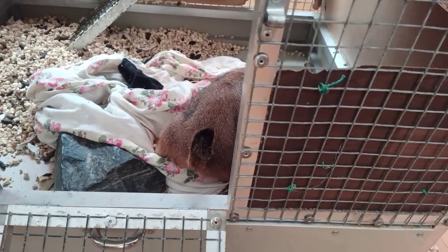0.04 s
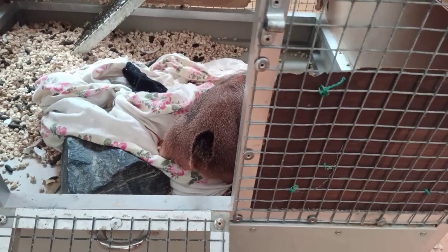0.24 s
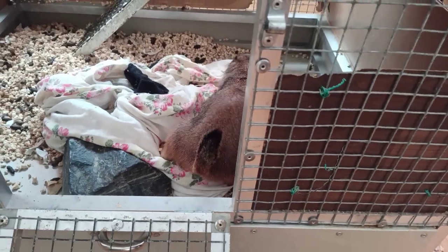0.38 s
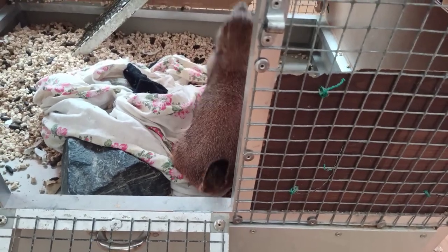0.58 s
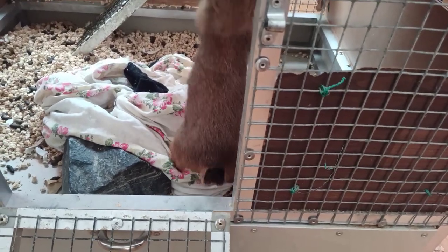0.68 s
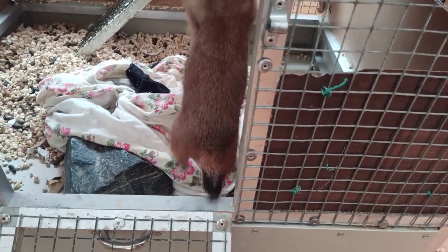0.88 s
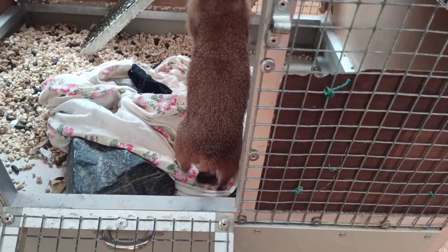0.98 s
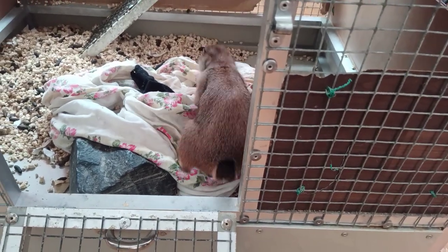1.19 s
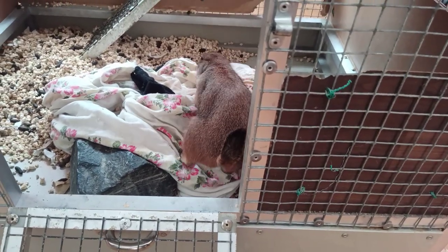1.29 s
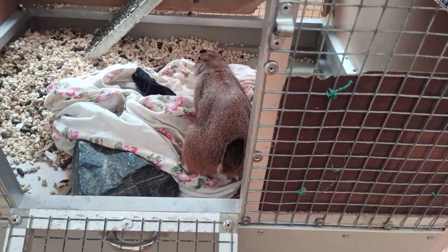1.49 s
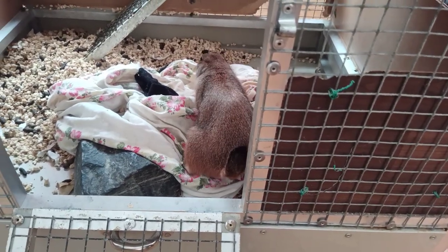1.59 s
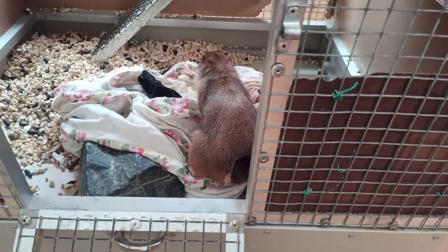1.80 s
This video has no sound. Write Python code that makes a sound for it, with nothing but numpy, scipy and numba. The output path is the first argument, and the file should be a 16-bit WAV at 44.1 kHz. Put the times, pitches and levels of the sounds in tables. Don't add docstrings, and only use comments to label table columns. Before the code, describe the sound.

Prairie dog shrieks and yips loudly in an indoor cage, with small paw knocks and wire rattle

```python
import sys
import numpy as np
from scipy import signal
from scipy.fft import rfft, irfft
from scipy.io import wavfile
from scipy.ndimage import uniform_filter1d
from numba import njit

SR = 44100
rng = np.random.default_rng(int(sys.argv[2]) if len(sys.argv) > 2 else 0)


def master_out(mix):
    frames = np.transpose(np.atleast_2d(mix))
    ceiling = np.clip(frames, -1, 1)
    pcm = np.round(ceiling * 32767).astype(np.int16)
    wavfile.write(sys.argv[1], SR, pcm)


def volts_from_decibels(level):
    exponent = np.asarray(level, float) / 20
    return 10 ** exponent


N = 81585
T = np.arange(N) / SR

# pitch_hz, level_db
FLOOR_COLOUR = [(40, -15), (100, -5.5), (280, -11.5), (700, -20.5), (1700, -26), (2400, -23),
                (11000, -36.5), (15500, -39)]
# start_s, level_db, contact_s, loudest_pitch_hz, spread_octaves
PAW_THUDS = [(0.015, -41, 0.0038, 467, 0.24), (0.026, -36, 0.008, 328, 0.53),
             (0.044, -53, 0.0092, 450, 0.2), (0.06, -43, 0.055, 195, 0.35),
             (0.083, -40.5, 0.023, 113, 0.41), (0.084, -49.5, 0.0051, 460, 0.27),
             (0.152, -43.5, 0.032, 91, 0.64), (.172, -51.5, .02, 420, .3), (.22, -43, .05, 199, 0.18),
             (.3, -66, .02, 259, .3), (0.368, -32, 0.0051, 216.4, 0.83), (0.388, -44.5, 0.035, 460, 0.25),
             (0.593, -30.5, 0.027, 233, 0.8), (0.885, -43, 0.012, 411, 0.68),
             (.905, -52.5, 0.049, 85.5, 0.66), (1.038, -54, 0.016, 520, 0.16),
             (1.549, -43, 0.008, 550, 0.13), (1.556, -35.5, 0.032, 130, .3),
             (1.587, -57.5, 0.031, 420, 0.72), (1.598, -47, 0.013, 130, .3),
             (1.635, -43.5, 0.042, 125, 0.47), (1.693, -50.5, 0.017, 257, 0.46),
             (1.705, -56.5, 0.018, 640, .4), (1.711, -49, 0.029, 127, .6), (1.836, -50.5, 0.017, 896, 0.73)]
# pitch_hz, level_db, t60_s
TRAY_MODES = [(69.6, -4.5, 0.8), (104.2, -20, 0.2), (130, -3.5, 0.14), (219, 1, 0.043), (255, 6, 0.067),
              (320.6, 10.5, 0.035), (420, 6.5, 0.12), (496.4, 7.5, 0.1), (549, 2.5, .06), (640, 0, 0.24),
              (755, 0.5, 0.067), (1030, 5, .05)]
# start_s, wire_crack_level_db, dry_scrape_level_db, contact_s
WIRE_TOUCHES = [(0.024, -68.5, -68.5, 0.02), (0.551, -60, -47, 0.011), (.578, -55, -41, 0.0094),
                (0.588, -34, -40, 0.021), (0.594, -23.5, -40, 0.0089), (0.615, -27, -50, 0.0082),
                (0.8833, -36.5, -75, 0.0031), (0.898, -49, -72, 0.013), (0.93, -60, -70, 0.01),
                (1.037, -58, -91, 0.004), (1.289, -67, -89, 0.0087), (1.551, -58, -45.5, 0.0092),
                (1.56, -59.5, -53.5, 0.022), (1.588, -63, -68.5, 0.012), (1.687, -58, -55, 0.015),
                (1.837, -74.5, -90, 0.0097)]
# pitch_hz, level_db
CRACK_COLOUR = [(150, -15.5), (400, 6), (1800, 1), (3500, 4), (5000, 5), (6800, -13.5), (9500, -19),
                (12000, -50.5)]
SCRAPE_COLOUR = [(2000, -23.5), (4500, -10.5), (6500, -17.5), (8800, 5.5), (11000, -12), (14800, -1.5),
                 (15800, -3)]

# time_s, pitch_hz, level_db, roughness_0_to_1, mouth_opening_0_to_1
CRY = [
    (.177, 740, -59.5, 0.24, 0.24),
    (.186, 718, -42.5, 0.37, 0),
    (.196, 736.7, -44.5, 0.27, 0.04),
    (.203, 860, -39, 0.13, 0.32),
    (.235, 869, -31, 0.07, 0.09),
    (.264, 888.5, -44.5, 0, 0.44),
    (.272, 959, -36, 0.5, 0.4),
    (.285, 1078, -28, 0.2, 0.64),
    (.298, 1151, -27, 0.2, 0.8),
]
SCREAM = [
    (.294, 1162, -32.5, 0.27, 0.98),
    (.31, 1178, -22.5, 0.33, 0.98),
    (.335, 1225, -27, .35, 0.84),
    (.36, 1280, -23, 0.35, 1),
    (.385, 1266, -27, 0.7, 0.95),
    (.41, 1285, -30.5, 0.32, 1),
    (.445, 1282, -35, 1, 0.96),
]
RASP = [
    (.385, 1123, -36.5, .6, 1),
    (.4, 1111, -29, 0.57, 1),
    (.42, 1111, -33, 1, 0.92),
    (.448, 1097, -24.5, 0.58, 1),
    (.49, 1051, -30, 0.59, 1),
    (.52, 982, -32, 0.56, 0.88),
    (.555, 908, -40.5, 0.28, 0.7),
]
YIP = [
    (.548, 978.6, -34, 0.53, 0.87),
    (.578, 1138, -27, 0.16, 0.87),
    (.62, 1201, -26, 0.022, 0.91),
    (.64, 1215, -20, 0.013, 1),
    (.686, 1178, -24, 0.017, 0.99),
    (.7, 1124, -21, 0.16, 0.98),
    (.716, 1065, -51, 0.21, 0.99),
    (.78, 980, -41, 0.89, 0.24),
    (.86, 662, -51.5, 0.82, 0),
]
BARK = [
    (1.037, 1030, -44, 1, 0.46),
    (1.048, 1006, -45.5, 0.73, 0.89),
    (1.058, 1068, -36.5, 0.2, 0.88),
    (1.074, 1149, -41, 0.93, 0.99),
    (1.09, 1175, -39.5, 0.39, 0.94),
    (1.122, 1226, -33.5, 0.22, 1),
    (1.129, 1043, -41.5, 0.67, 1),
    (1.145, 1039, -45, 0.64, 1),
    (1.19, 1138, -54.5, 1, 1),
]
WHISTLE = [
    (1.275, 1688, -59, 0.018, 0.3),
    (1.283, 1520, -46, 0.054, 0.36),
    (1.291, 1491, -36, 0.12, 0.87),
    (1.32, 1426, -43.5, 0.056, 0.4),
    (1.365, 1407, -42, 0.033, 0.83),
    (1.405, 1307, -42, 0.053, 0.55),
    (1.422, 1248, -44, 0.077, 0.84),
    (1.45, 1203, -57, 0.035, 0.99),
    (1.478, 1098, -58.5, 0.052, 0.19),
]
# pitch_hz, level_db
CLOSED_MOUTH = [(880, -1.5), (1750, -19), (3400, -24), (4200, -58.5), (5800, -11.5), (7200, -43),
                (8600, -24), (10000, -51)]
CLOSED_THROAT = [(400, -15), (900, 0), (1500, -8), (2500, -24), (5000, -58), (9000, -85)]
CRY_OPEN = [(700, -17), (1150, -10), (1650, -14), (2400, 3.5), (3100, -5.5), (4600, -10), (7000, -34.5),
            (15000, -67)]
SCREAM_OPEN = [(700, -15.5), (1150, -13), (1650, -13.5), (2400, 3.5), (4300, -6), (6600, -21),
               (7400, -32.5), (13500, -47.5)]
YIP_OPEN = [(600, -14.5), (1200, -10), (2400, -8), (4800, -11), (6000, -16), (8400, -28.5), (11800, -48.5),
            (14500, -42)]
BARK_OPEN = [(500, -34), (1150, -9), (1700, -16), (2350, 12), (3700, -24), (4800, -2), (6800, -32.5),
             (8400, -37)]
WHISTLE_OPEN = [(1400, -3.5), (2800, -13.5), (4300, -27.5), (5000, -30), (5700, -5.5), (7000, -47),
                (8700, -18.5), (10000, -65)]

JITTER_RAD, JITTER_RATE, TREBLE_SHAKE_RAD = 0.6, 450, 0.009
WANDER, WANDER_RATE = 0.022, 80
FLICKER_DB, FLICKER_RATE, SHIMMER_DB = 3.6, 130, 1.5
BREATH_DB, HALF_OCT = -3, 0.12
LOWEST_HZ, TOP_HZ = 330, 15900
ROOM_T60_S, ROOM_DB, ROOM_DAMP = 0.36, -13.5, 0.35
FLOOR_DB = -74.5


def unit(x):
    return x / np.sqrt(np.mean(x ** 2))


def colour(table, hz):
    table = np.array(table)
    return np.interp(np.log(np.maximum(hz, 1)), np.log(table[:, 0]), table[:, 1])


def noise(table):
    hz = np.arange(N // 2 + 1) * SR / N
    spectrum = rfft(rng.standard_normal(N)) * volts_from_decibels(colour(table, hz))
    return unit(irfft(spectrum, N))


def walk(rate):
    hold = max(int(SR / rate), 2)
    levels = rng.standard_normal(N // 2 + 1)[:N // hold + 1]
    steps = np.repeat(levels, hold)[:N]
    return unit(uniform_filter1d(uniform_filter1d(steps, hold), hold))


def room_floor():
    return volts_from_decibels(FLOOR_DB + 1.7 * walk(1.1)) * noise(FLOOR_COLOUR)


def contacts(start_s, length_s):
    age = T - start_s[:, None]
    return np.clip(age / 0.00069, 0, 1) * np.exp(-np.abs(age) / length_s[:, None])


def tray():
    start_s, level_db, length_s, spot_hz, spread_oct = np.array(PAW_THUDS).T
    push = contacts(start_s, length_s) * rng.standard_normal(N)
    ringing = 0
    for hz, db, t60 in TRAY_MODES:
        pole = np.exp(2j * np.pi * hz / SR - np.log(1000) / (t60 * SR))
        octaves_off = np.log2(hz / spot_hz) / spread_oct
        share = volts_from_decibels(db + level_db - 11.9 * octaves_off ** 2)
        ringing = ringing + signal.lfilter([1], [1, -pole], share @ push).imag
    return volts_from_decibels(-32) * ringing


def rattle(column, table):
    rows = np.array(WIRE_TOUCHES)
    force = volts_from_decibels(rows[:, column]) @ contacts(rows[:, 0], rows[:, -1])
    return force * volts_from_decibels(2.2 * walk(600)) * noise(table)


def call(rows, closed, opened, odd_db, half_db, half_hz, leak):
    rows = np.array(rows)
    start, end = rows[0, 0], rows[-1, 0]
    on = (T > start) & (T < end)
    t = T[on]
    hz, db, rough, mouth = (np.interp(t, rows[:, 0], rows[:, c]) for c in range(1, 5))
    rough, mouth = np.clip(rough, 0, 1), np.clip(mouth, 0, 1)

    hz = hz * (1 + WANDER * rough * walk(WANDER_RATE)[on])
    phase = 2 * np.pi * np.cumsum(hz) / SR
    shake = JITTER_RAD * rough * walk(JITTER_RATE)[on]
    treble_shake = TREBLE_SHAKE_RAD * walk(JITTER_RATE)[on]

    k = np.arange(1, 32)[:, None] / 2
    partial_hz = k * hz
    places = (np.flatnonzero(on) + (k * 9973).astype(int)) % N
    depth = np.sqrt(np.minimum(rough * k / 2 + 0.02 * k, 0.8))
    flicker = FLICKER_DB * depth * walk(FLICKER_RATE)[places]

    half = (half_db - 6 * (np.log2(partial_hz / half_hz) / HALF_OCT) ** 2) * (k % 1 > 0)
    odd = odd_db * mouth * (3 / k) ** 2 * ((k % 2 == 1) & (k > 2))
    throat = (1 - mouth) * colour(closed, partial_hz) + mouth * colour(opened, partial_hz)
    audible = (partial_hz < 1.15 * opened[-1][0]) & (partial_hz < TOP_HZ)
    gain = audible * volts_from_decibels(throat + half + odd)

    angle = k * phase + k ** 1.35 * shake + k * k * treble_shake + k * k
    tone = np.sum(gain * volts_from_decibels(flicker) * np.cos(angle), axis=0) / np.sqrt(np.sum(gain ** 2, axis=0))
    tone = tone * volts_from_decibels(SHIMMER_DB * rough * walk(250)[on])

    breath = mouth * noise(opened)[on] + (1 - mouth) * noise(closed)[on]
    breath = breath * (1 + 0.24 * np.cos(phase))
    hiss = volts_from_decibels(BREATH_DB) * (rough * breath + leak * np.gradient(breath))

    gate = np.clip(np.minimum(t - start, end - t) / 0.0013, 0, 1)
    out = np.zeros(N)
    out[on] = gate * volts_from_decibels(db) * ((1 - 0.17 * rough) * tone + hiss)
    return out


def prairie_dog():
    voice = (call(CRY, CLOSED_MOUTH, CRY_OPEN, odd_db=6.0, half_db=-19.5, half_hz=426, leak=0.8)
             + call(SCREAM, CLOSED_MOUTH, SCREAM_OPEN, odd_db=0.0, half_db=-11.5, half_hz=4300, leak=0.4)
             + call(RASP, CLOSED_MOUTH, CRY_OPEN, odd_db=-9.5, half_db=-9.5, half_hz=2650, leak=0.84)
             + call(YIP, CLOSED_THROAT, YIP_OPEN, odd_db=-19.5, half_db=-9.5, half_hz=3150, leak=0.29)
             + call(BARK, CLOSED_THROAT, BARK_OPEN, odd_db=-1.0, half_db=2, half_hz=2880, leak=0.087)
             + call(WHISTLE, CLOSED_THROAT, WHISTLE_OPEN, odd_db=-4.5, half_db=-12, half_hz=3430, leak=0.05))
    return signal.sosfilt(signal.butter(4, LOWEST_HZ, "high", fs=SR, output="sos"), voice)


@njit
def walls(x, lags, gain, damp):
    line, soft, out = np.zeros((8, 4096)), np.zeros(8), np.zeros(len(x))
    for i in range(len(x)):
        total = 0.
        for k in range(8):
            soft[k] += (1 - damp) * (gain[k] * line[k, (i - lags[k]) & 4095] - soft[k])
            total += soft[k]
            out[i] += soft[k] * (1 - 2 * (k % 2))
        for k in range(8):
            line[k, i & 4095] = x[i] + soft[k] - total / 4
    return out


def scene():
    near = tray() + rattle(column=1, table=CRACK_COLOUR) + prairie_dog()
    lags = np.array([433, 611, 787, 967, 1153, 1381, 1607, 1877])
    decay = volts_from_decibels(-60 * lags / SR / ROOM_T60_S)
    room = walls(near + 1e-18, lags, decay, ROOM_DAMP)
    scrape = rattle(column=2, table=SCRAPE_COLOUR)
    return (near + volts_from_decibels(ROOM_DB) * room + scrape + room_floor())[None]


def low_pass(x):
    return signal.sosfilt(signal.butter(12, 16830, fs=SR, output="sos"), x)


def record(dry):
    x = signal.sosfilt(signal.butter(4, 72, "high", fs=SR, output="sos"), dry)
    x = signal.sosfilt(signal.ellip(8, 0.2, 60, TOP_HZ, fs=SR, output="sos"), x)
    return low_pass(x)


dry = scene()
out = record(dry)
master_out(out)
```